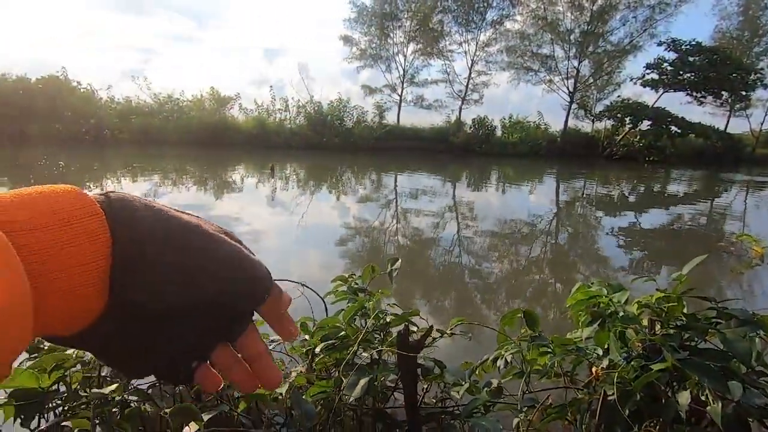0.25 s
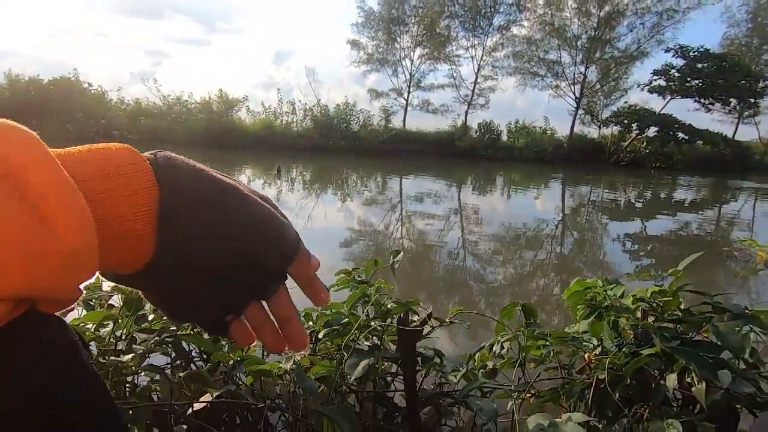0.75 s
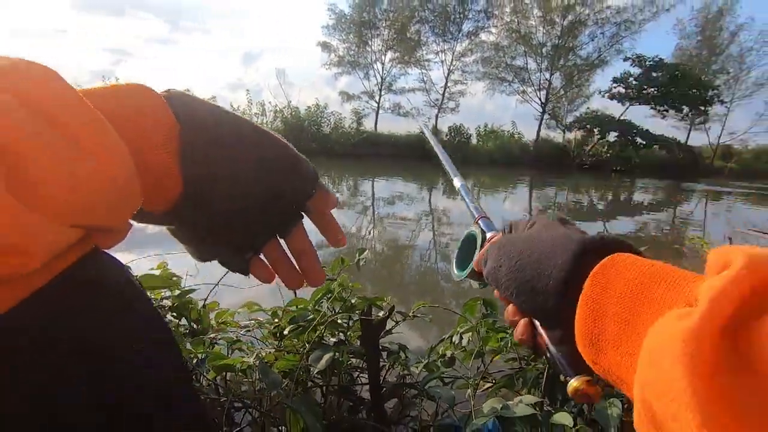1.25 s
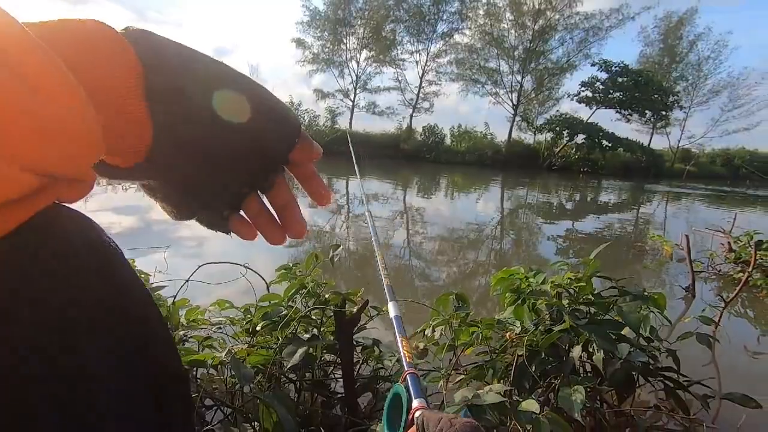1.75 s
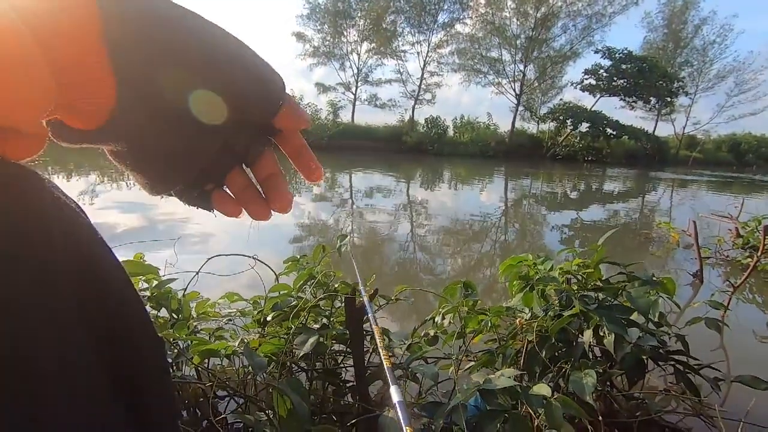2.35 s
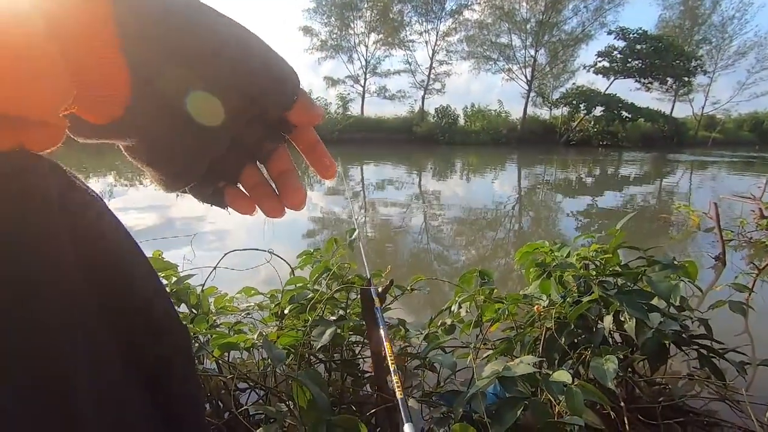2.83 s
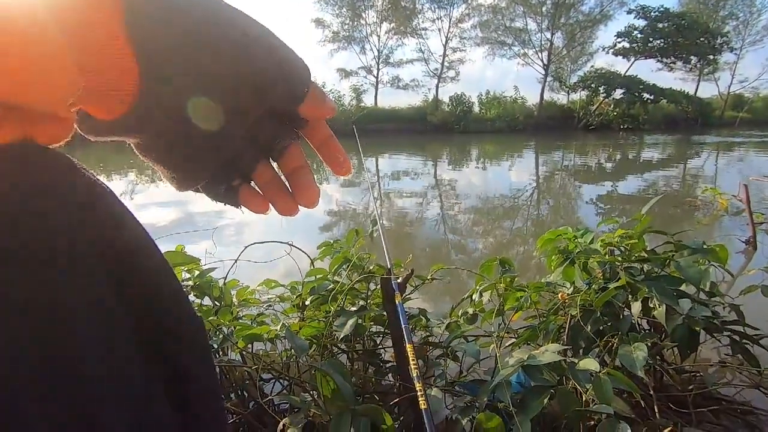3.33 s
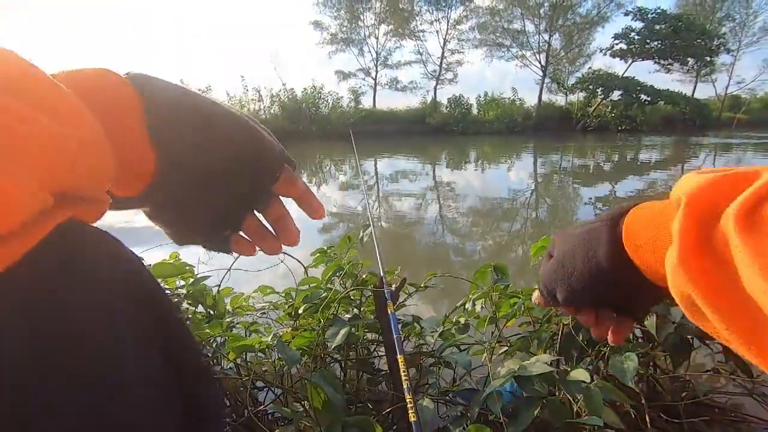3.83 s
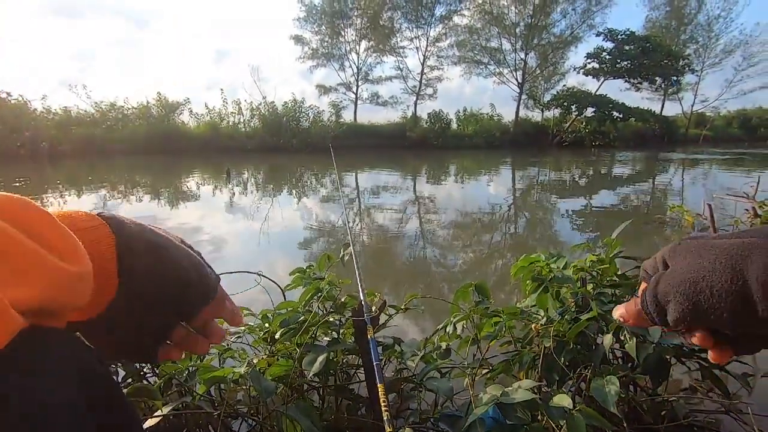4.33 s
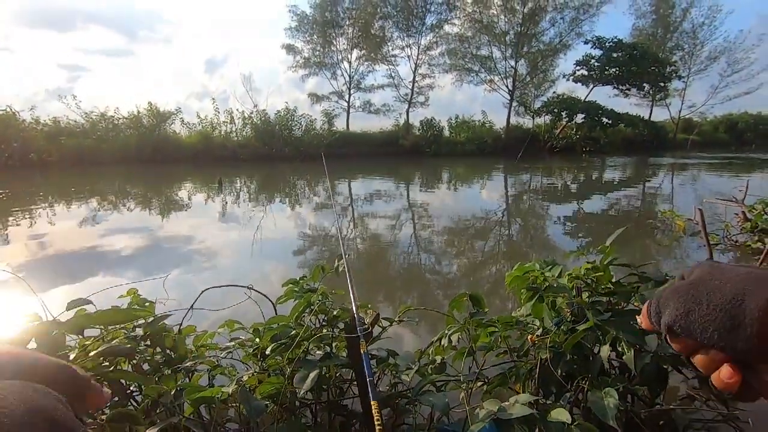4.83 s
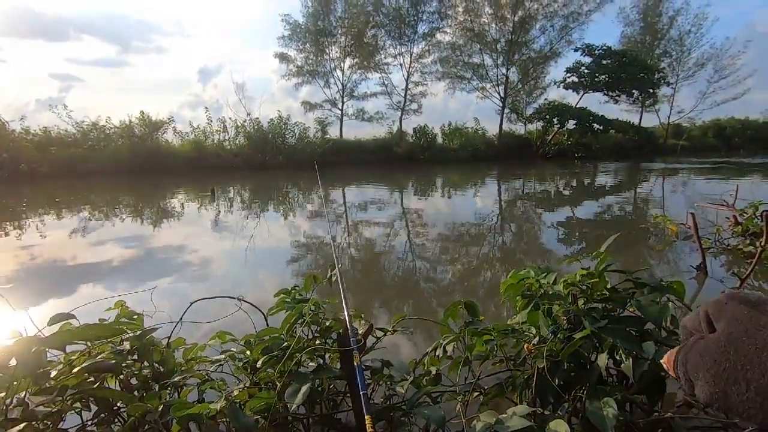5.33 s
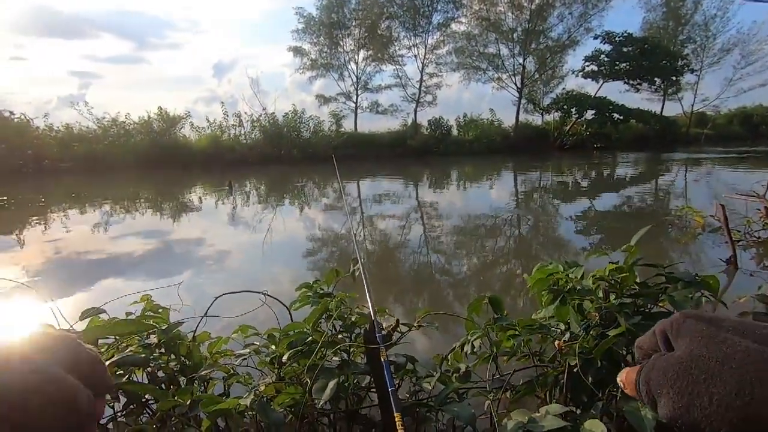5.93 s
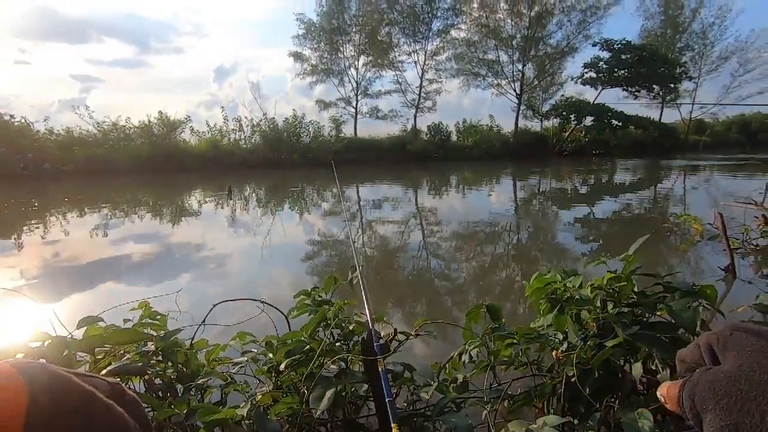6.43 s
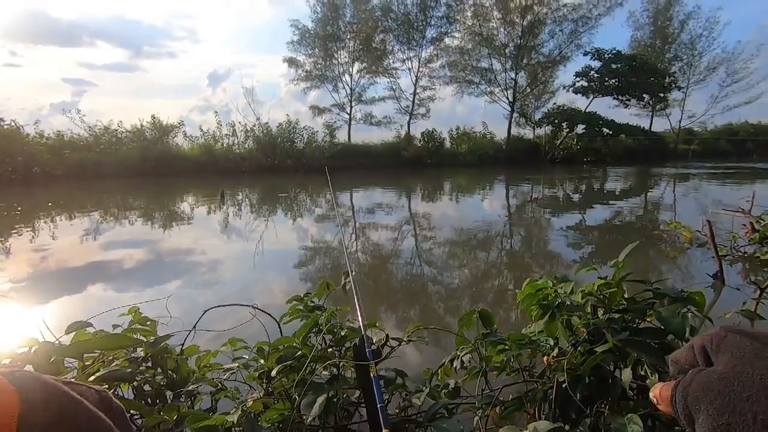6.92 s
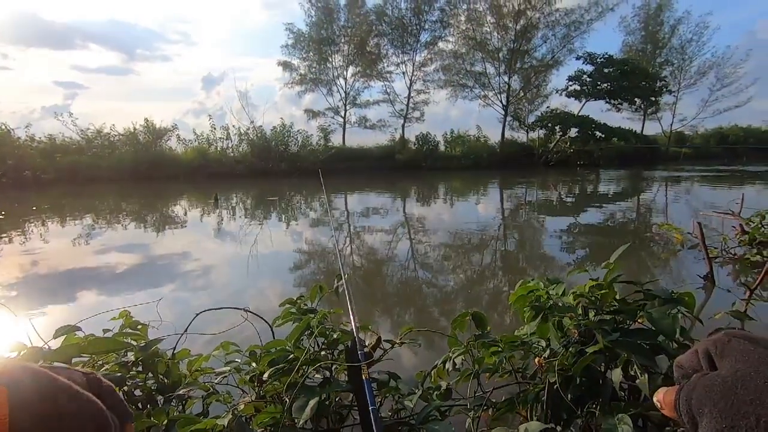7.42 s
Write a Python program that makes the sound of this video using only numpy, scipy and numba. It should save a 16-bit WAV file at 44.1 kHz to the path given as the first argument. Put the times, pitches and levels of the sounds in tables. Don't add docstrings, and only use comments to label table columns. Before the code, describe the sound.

A low, fast engine chug grows steadily behind the listener beside water, swelling into a rough, hissing roar at about four and a half seconds before it recedes, lower and duller. Early on, hard ticks, a run of soft wooden knocks and a short leafy scrape sound very near, slightly right. Fine insect shimmer and gusting wind rumble continue throughout; the small outdoor microphone is dry, without room reverberation.

```python
import sys
import numpy as np
from scipy import signal
from scipy.io import wavfile
from scipy.ndimage import uniform_filter1d
from numba import njit

SR = 44100
rng = np.random.default_rng(int(sys.argv[2]) if len(sys.argv) > 2 else 0)


def amplitude_ratio(level_db):
    exponent = np.asarray(level_db, float) / 20
    return 10 ** exponent


def generate_wav(signal):
    frames = np.transpose(np.atleast_2d(signal))
    scaled = np.clip(frames, -1, 1) * 32767
    pcm = np.round(scaled).astype(np.int16)
    wavfile.write(sys.argv[1], SR, pcm)


N = 338244
TIME = np.arange(N) / SR


def level(x, db=0):
    return x * amplitude_ratio(db) / np.sqrt(np.mean(x ** 2))


def curves(table):
    s, *columns = np.transpose(table)
    return [np.interp(TIME, s, c) for c in columns]


def on_log_hz(hz, table):
    f, value = np.transpose(table)
    return np.interp(np.log(hz), np.log(f), value)


def heard_between(start, end, fade_s):
    return np.clip(np.minimum(TIME - start, end - TIME) / fade_s, 0, 1)


def pan(x, db):
    return x * amplitude_ratio(np.array([db, -db]).reshape(2, -1) / 2)


@njit
def svf(x, hz, width):
    y, b, l = np.empty(len(x)), 0., 0.
    for i in range(len(x)):
        g, k = np.tan(np.pi * hz[i] / SR), width / hz[i]
        v = (b + g * (x[i] - l)) / (1 + g * (g + k))
        b, l, y[i] = 2 * v - b, l + 2 * g * v, k * v
    return y


def band(x, hz, width, steep=False):
    hz = hz * np.ones(len(x))
    y = svf(x + 1e-18, hz, 1. * width)
    return svf(y, hz, 1. * width) if steep else y


def walk(rate):
    k = int(SR / rate)
    held = np.repeat(rng.standard_normal(N // k + 1), k)
    return 1.13 * uniform_filter1d(uniform_filter1d(held, k), k)[:N]


# pitch_hz, share
LIKENESS = [(30, 0.88), (60, 1), (200, 0.9), (330, 0.5), (500, 0.11), (1000, 0.038), (2000, 0.11),
            (3500, 0.86), (6000, 0.2), (10000, 0.24), (15000, .1)]
# pitch_hz, left_minus_right_db
LEAN = [(60, 0), (400, -3), (550, -5), (1200, 0.7), (4400, -0.1), (8000, 0), (14000, 11)]


def hiss(colour, flicker_db, rate, treble_db=0, low_db=0):
    plain, lifted = 0, 0
    lowest, highest = np.transpose(colour)[0][[0, -1]]
    for hz in lowest * 2 ** np.arange(0, np.log2(highest / lowest), 1 / 3):
        mid, side = (band(rng.standard_normal(N), hz, hz / 3, steep=True) for _ in range(2))
        like = np.clip(on_log_hz(hz, LIKENESS), 0, 1)
        treble_lift_db = np.clip(np.log2(hz / 2200) / 0.81, 0, 1.3) * treble_db
        low_lift_db = np.clip(np.log2(980 / hz) / .5, 0, 1) * low_db
        gain = amplitude_ratio(on_log_hz(hz, colour) + flicker_db * walk(rate))
        pair = np.sqrt(1 + like) * mid + np.sqrt(1 - like) * side * np.array([[1], [-1]])
        pair = gain * pan(pair, on_log_hz(hz, LEAN))
        plain = plain + pair
        lifted = lifted + pair * amplitude_ratio(treble_lift_db + low_lift_db)
    return lifted / np.sqrt(np.mean(plain ** 2))


SPEED_M_S, PASSES_S, TRACK_M = 8.131, 4.643, 3.63


def bearing():
    along = SPEED_M_S * (TIME - PASSES_S)
    metres = np.hypot(along, TRACK_M)
    return along / metres, 20 * np.log10(TRACK_M / metres)


# peak_s, length_s, pitch_hz, level_db
ECHOES = [(4.485, 0.31, 351, -12.5), (4.8, 0.19, 351, -6.5), (6.01, 0.29, 351, 3.5), (1.57, 0.29, 351, 4.5),
          (0.46, 0.97, 351, -2.5), (4.835, 0.21, 330, -15), (4.2, 0.16, 238, -7.5), (1.4, 0.093, 130, 1),
          (4.604, 0.25, 1500, -4.5), (5.0, 0.083, 1500, 0.5), (2.28, 0.36, 1500, 3.5), (3.3, .15, 60, 1.5),
          (0.29, 0.098, 60, 3.5), (1.2, 0.17, 60, -8), (2.25, 0.091, 60, 2), (6.6, 0.22, 60, -4),
          (4.7, 0.11, 60, -17), (1, 0.15, 500, -3), (1.9, 0.26, 580, -5), (6.9, 0.39, 730, -8),
          (5.29, 0.22, 500, 5), (5.5, .15, 160, -0.5), (3.6, .06, 1200, -9), (3.2, 0.059, 990, 7),
          (4.18, 0.075, 980, -14), (5.04, 0.28, 6000, -2), (5.85, 0.24, 6000, 3.5),
          (0.12, 0.27, 1500, -3.5), (.1, .4, 351, -6.5), (6.8, 0.28, 351, -3)]
ECHO_OCTAVES = .25


def reach(hz, db, coming, going):
    side, loss_db = bearing()
    echo_db = 0
    for s, length, f, d in ECHOES:
        in_band = np.exp(-(np.log2(f / hz) / ECHO_OCTAVES) ** 2)
        echo_db = echo_db + d * in_band * np.exp(-((TIME - s) / length) ** 2)
    return db + np.where(side < 0, coming, going) * loss_db + echo_db


# pitch_hz, width_hz, level_db, polarity
THUMP = [(60, 20, 0, 1)]
PIPE = [(115, 59, -10, 1), (143, 74, 0, -1), (200, 43, 0, 1)]
HEADER = [(238, 150, 0, 1)]
SILENCER = [(351, 70, 0, -1)]
OUTLET = [(390, 110, 0, -1)]
# pitch_hz, level_db, coming, going
EXHAUST_REACH = [
    (60, -34.5, 0.7, 0.6),
    (161, -31.5, 0.73, 0.76),
    (244, -40, 0.93, 1.44),
    (355, -35, 1.28, 1.48),
    (474, -48.5, 4, 3.7),
]
UNEVEN_DB = [0.76, 0.84, 0.93, 1.62, 2.2]
FIRST_ORDER_DB = -18
JITTER_S, JITTER_S_PER_DB = .00008, .00001
BANK_S, BANK_DB, BANK_GROWTH = 0.01757, -17, 0.41


def exhaust(hz, turns):
    loss_db = bearing()[1]
    at = np.flatnonzero(np.diff(np.floor(turns)))
    late, common, *own = rng.standard_normal((len(at), 7)).T
    shift = (JITTER_S - JITTER_S_PER_DB * loss_db[at]) * SR * late
    at = np.clip(at + shift.astype(int), 0, N - 1)
    doppler, out = hz / 29.3, 0
    heard_db = [reach(*part) for part in EXHAUST_REACH]
    parts = (THUMP, PIPE, HEADER, SILENCER, OUTLET)
    for modes, db, uneven_db, chance in zip(parts, heard_db, UNEVEN_DB, own):
        pulses = np.zeros(N)
        pulses[at] = amplitude_ratio(0.49 * common + uneven_db * chance)
        ringing = 0
        for f, width, mode_db, sign in modes:
            ringing = ringing + sign * amplitude_ratio(mode_db) * band(pulses, f * doppler, width, steep=True)
        out = out + amplitude_ratio(db) * level(ringing)
    echo = band(np.roll(out, int(BANK_S * SR)), 329, 90)
    out = out + amplitude_ratio(BANK_DB - BANK_GROWTH * loss_db) * echo
    first_order_db = heard_db[0] + FIRST_ORDER_DB + 2.5 * walk(8)
    return out + amplitude_ratio(first_order_db) * np.cos(2 * np.pi * (turns - .46))


# pitch_hz, level_db per Hz
ROAR_COLOUR = [(400, -7), (500, -5), (600, -3), (800, -6.5), (1000, -2), (1300, -7.5), (2000, -9),
               (2900, -13), (4460, -22), (8000, -22.5), (9100, -35), (10300, -54), (11800, -42),
               (14500, -48)]


def strands(hz, count):
    out = 0
    for k in 20 * 6.5 ** ((np.arange(count) + rng.random(count)) / count):
        db = on_log_hz(k * 29, ROAR_COLOUR) + 4.6 * walk(5)
        wavering_hz = k * hz * (1 + 0.0059 * walk(4))
        tone = level(band(rng.standard_normal(N), wavering_hz, 18 + 0.54 * k, steep=True))
        out = out + pan(amplitude_ratio(db) * tone, 4.1 * walk(2.8))
    return level(out)


# start_s, rate_hz
ENGINE = [(0, 28.011), (2, 28.465), (4.6, 28.882), (6.3, 28.662), (7.67, 27.945)]
# multiple of firing rate, width_hz, start_s, end_s, level_db against roar
WHINE = [(42.3, 150, 0.43, 3, -12), (67.2, 40, 0.91, 3.8, -17), (67.6, 140, 4.0, 4.78, -10.5),
         (68, 120, 4.6, 5.7, -14), (101.3, 140, 0.78, 3.83, -15.5), (101.46, 120, 3.58, 5.4, -13.5),
         (34, 130, 2.83, 5.4, -13), (83.9, 83, 5, 6.1, -15), (101.2, 66, 6.2, 6.9, -16),
         (38.4, 33, 5.8, 7.9, -12), (32.5, 100, 5.4, 7.63, -8.5), (23.05, 38, 6, 8.4, -13.5),
         (130, 83, 4.5, 6.6, -25.5), (63.7, 500, 5.7, 6.5, -11.5)]
# pitch_hz, level_db, coming, going
ROAR_REACH = (1500, -42, 1.1822, 1.2839)
TREBLE_REACH = (6000, -11, 0.27, 0.62)
LOW_REACH = (498, -4.5, 0.23, 0.44)
GEAR = (990, -51, 0.9, 1.2)
GEAR_TEETH, GEAR_FROM_S, GEAR_TO_S = 34, .85, 4.3
START_TURN = .74
ROAR_PAN_DB, ROAR_SWING_DB = -0.43, 2.5


def motorbike():
    side = bearing()[0]
    hz = curves(ENGINE)[0] * (1 - side * SPEED_M_S / 343)
    turns = START_TURN + np.cumsum(hz) / SR
    roar_db, treble_db, low_db = reach(*ROAR_REACH), reach(*TREBLE_REACH), reach(*LOW_REACH)
    throb = amplitude_ratio(0.68 * walk(30)) * (1 + 0.1 * np.cos(2 * np.pi * (turns - .15)))
    roar = throb * hiss(ROAR_COLOUR, 1.7, 12, treble_db=treble_db + 12.5, low_db=low_db + 5.5)
    roar = roar + amplitude_ratio(-9.5) * strands(hz, count=26)
    for k, width, start, end, db in WHINE:
        tone = level(band(rng.standard_normal(N), k * hz, width, steep=True))
        roar = roar + heard_between(start, end, 0.12) * amplitude_ratio(db + 2.34 * walk(22)) * tone
    gear_gain = heard_between(GEAR_FROM_S, GEAR_TO_S, 0.34) * amplitude_ratio(reach(*GEAR) + 3.5 + 1.6 * walk(24.92))
    gear = gear_gain * np.sin(2 * np.pi * GEAR_TEETH * turns + 0.9 * walk(12))
    pan_db = ROAR_PAN_DB + ROAR_SWING_DB * side
    return exhaust(hz, turns) + pan(amplitude_ratio(roar_db + 1.25) * roar + gear, pan_db)


# pitch_hz, level_db per Hz
RUMBLE_COLOUR = [(25, -27), (33, -13), (43, 0), (55, 1), (72, 0.5), (115, -1.5), (185, -6.5), (240, -12.5),
                 (310, -12), (390, -25)]
# pitch_hz, level_db, coming, going
RUMBLE_REACH = (92, -42.5, 0.35, 0.48)
# peak_s, length_s, level_db
GUSTS = [
    (.15, 0.14, -3.5),
    (1.4, 0.14, 0.5),
    (2.206, 0.18, 3),
    (3.2, 0.059, -1),
    (4.15, 0.2, -1.5),
    (5.5, 0.24, 2.5),
    (6.6, 0.074, -2),
    (7.305, 0.21, 1.5),
]
GUST_DB, GUST_RATE = 1.77, 7.6


def breeze():
    gust_db = GUST_DB * walk(GUST_RATE)
    for s, length, db in GUSTS:
        gust_db = gust_db + db * np.exp(-((TIME - s) / length) ** 2)
    return amplitude_ratio(reach(*RUMBLE_REACH) + gust_db + 3) * hiss(RUMBLE_COLOUR, 3.64, 7)


# pitch_hz, level_db per Hz
AIR = [(320, -34), (550, -9), (983, 7.5), (1160, 9.5), (1960, -17), (7210, -13.5), (8630, -18), (9910, -38),
       (11900, -53), (14000, -33), (15000, -44)]
AIR_DB = -72.5


def air():
    return amplitude_ratio(AIR_DB) * hiss(AIR, 1.4, 6.7)


# start_s, end_s, last_level_db
INSECT_CALLS = [
    (0.028, 0.337, -71),
    (.45, 0.913, -71.5),
    (0.798, 1.35, -65.5),
    (1.93, 2.27, -67.5),
    (3.3, 3.7, -85),
]
CALL_SWELL_DB, CALL_REST_DB = 6, -88


def lower_voice_db():
    db = np.full(N, 1. * CALL_REST_DB)
    for start, end, last_db in INSECT_CALLS:
        call_db = last_db - CALL_SWELL_DB * (end - TIME) / (end - start)
        db = np.where((TIME > start) & (TIME < end), np.maximum(db, call_db), db)
    return uniform_filter1d(db, SR // 50)


# start_s, level_db, left_minus_right_db
INSECTS = [(0, -76.5, 1), (.4, -73, 1), (.9, -76, 2), (1.35, -71, 2), (1.6, -73.5, 5), (2.3, -72.5, 1),
           (2.6, -75, 6), (3.2, -72.5, 4), (3.5, -74, 7), (4.2, -64.5, 7), (4.9, -69.5, 6), (5.6, -77.5, 3),
           (7.67, -77.5, 1.5)]
# start_s, end_s, level_db
SOLOS = [
    (.5, 0.7, -82),
    (1.24, 1.546, -74),
    (2.15, 2.45, -74),
]
SOLO_HZ = 10200
BUZZ_HZ, BUZZ_SHARE = 277, .8


def insects():
    main_db, pan_db = curves(INSECTS)
    stroke_count = np.floor(np.cumsum(BUZZ_HZ * (1 + .0008 * walk(10))) / SR)
    strokes = level(np.diff(stroke_count, prepend=0))
    voices = [(9590, 10550, main_db + 0.9, 0), (9000, 9900, lower_voice_db() - 3.0, BUZZ_SHARE),
              (13400, 14300, main_db - 16.0, 0)]
    out = 0
    for low_hz, high_hz, db, buzz in voices:
        noise = rng.standard_normal((3, N))
        source = noise[:2] + 0.51 * noise[2] + buzz * strokes
        sos = signal.butter(2, [low_hz, high_hz], "bandpass", fs=SR, output="sos")
        out = out + amplitude_ratio(db + 1.4 * walk(60)) * level(signal.sosfilt(sos, source))
    singer = level(band(rng.standard_normal(N), SOLO_HZ, 150, steep=True))
    for start, end, db in SOLOS:
        out = out + singer * amplitude_ratio(db) * heard_between(start, end, 0.028)
    return pan(out, pan_db)


def strike(events, rattle, ring_t60):
    out, t = np.zeros((2, N + SR)), np.arange(SR // 10) / SR
    for s, db, hz, width, ring_db, pan_db in events:
        push = (t == 0) + rattle * rng.standard_normal(len(t)) * amplitude_ratio(-60 * t / 0.0092)
        body = band(push, hz, width, steep=True)
        ring = amplitude_ratio(ring_db) * np.sin(2 * np.pi * hz * t) * amplitude_ratio(-60 * t / ring_t60)
        at = int(s * SR)
        out[:, at:at + len(t)] += pan(amplitude_ratio(db) * (body / np.max(np.abs(body)) + ring), pan_db)
    return out[:, :N]


# start_s, peak_db, pitch_hz, width_hz, ring_db
TICKS = [
    (0.03, -63, 3000, 3000, -18),
    (.1635, -62, 4300, 1200, -8),
    (0.8275, -44.5, 6140, 2000, -10),
    (.8272, -41.5, 2980, 9000, -28),
    (0.924, -38.5, 7200, 5000, -36),
    (0.923, -37.5, 2580, 1690, -19),
    (1.3370, -52, 2600, 1800, -10),
    (1.341, -50.5, 2950, 500, -10),
    (2.3397, -42, 4500, 7000, -24),
    (2.355, -42, 3020, 1500, -12),
]
TICK_PAN_DB = -8.5


def ticks():
    return strike([(*row, TICK_PAN_DB) for row in TICKS], 0.12, 0.046)


# start_s, peak_db, left_minus_right_db
KNOCKS = [(0.849, -54, -13), (0.902, -54, -8), (0.954, -51, -8), (1.006, -51, -7), (1.258, -50, -8),
          (1.375, -49, -12), (1.449, -46, -8), (1.497, -44.5, -10), (1.538, -46.5, -10), (1.583, -48, -12),
          (1.617, -50, -4.5), (1.648, -50, -13), (1.683, -51, -9)]
KNOCK_HZ = 584


def knocks():
    events = [(s + 0.00119, db + 2.5, KNOCK_HZ, 340, -11, pan_db) for s, db, pan_db in KNOCKS]
    return strike(events, 0.053, 0.017)


# start_s, peak_db, pitch_hz, width_hz, ring_db
HOUSING = [(0.9243, -35, 1210, 260, -1)]


def housing():
    return strike([(*row, -2.5) for row in HOUSING], .05, .03) * np.array([[-1], [1]])


# start_s, length_s, pitch_hz, level_db, left_minus_right_db
BRUSHES = [
    (1.356, 0.091, 6300, -70.5, -4),
    (1.765, .02, 8000, -71, -1.5),
    (2.012, 0.16, 6040, -73.5, -10),
    (2.313, 0.06, 3280, -52, -5),
    (2.301, 0.086, 7000, -57, -2),
    (2.325, .03, 11600, -59, -1.5),
    (2.485, 0.038, 5000, -66, -4),
    (2.55, .02, 7500, -69, -1.5),
    (7.0, 0.065, 7000, -80, -2),
]


def brushes():
    out = np.zeros((2, N))
    for s, length, hz, db, pan_db in BRUSHES:
        at, n = int(s * SR), int(length * SR)
        grain_gain = amplitude_ratio(1.9 * rng.exponential(size=SR // 4))[:n]
        grains = rng.standard_normal((3, SR // 4))[:, :n] * grain_gain
        leaves = np.array([band(g + 0.66 * grains[2], hz, 0.53 * hz, steep=True) for g in grains[:2]])
        swell = np.sin(np.pi * np.arange(n) / n)
        out[:, at:at + n] += pan(level(leaves, db) * swell, pan_db)
    return out


def scene():
    hands = ticks() + knocks() + housing() + brushes()
    return pan(motorbike() + breeze(), -0.34) + air() + insects() + hands


def low_pass(x):
    return signal.sosfilt(signal.butter(12, 15640, fs=SR, output="sos"), x)


MIC_TOP_HZ = 14100


def record(dry):
    mix = signal.sosfilt(signal.butter(8, MIC_TOP_HZ, fs=SR, output="sos"), dry)
    return low_pass(mix)


dry = scene()
out = record(dry)
generate_wav(out)
```